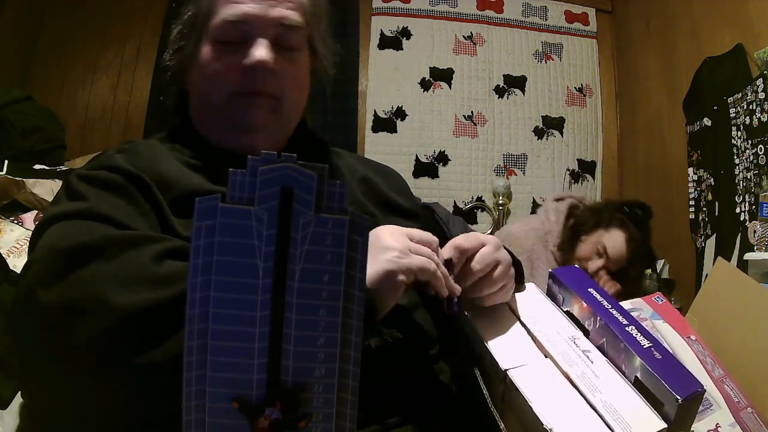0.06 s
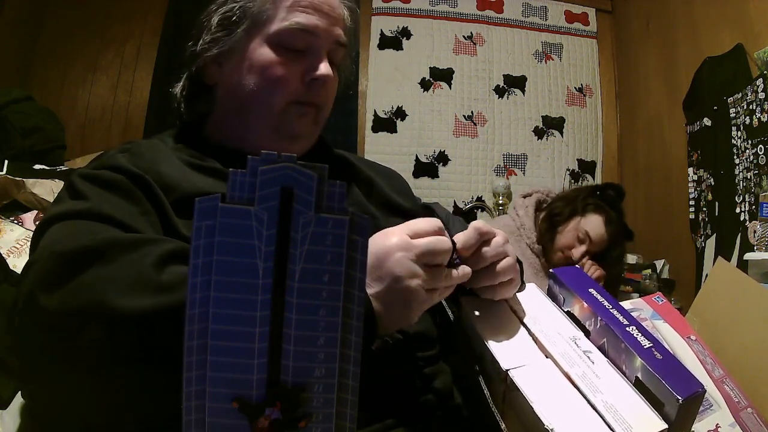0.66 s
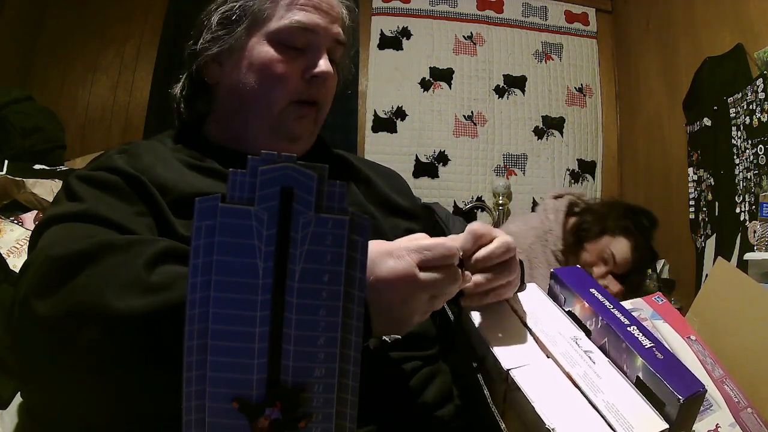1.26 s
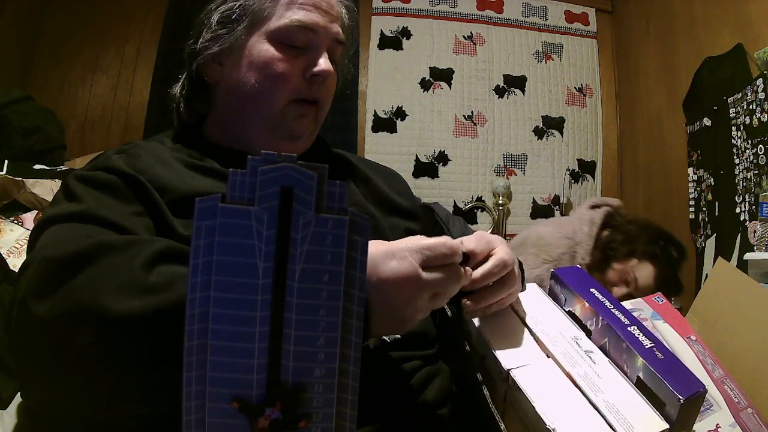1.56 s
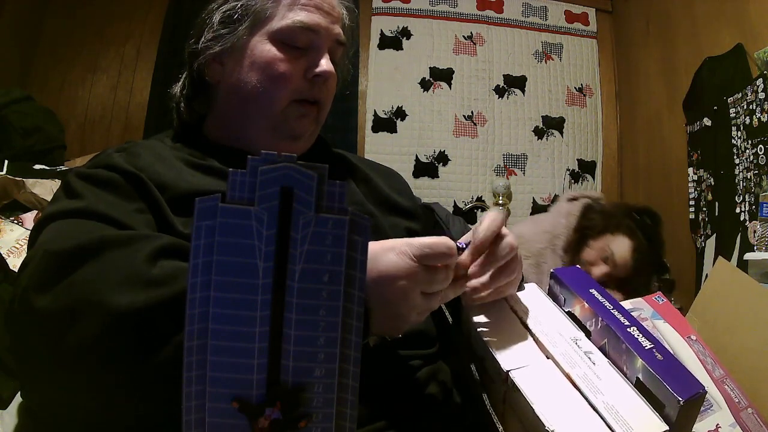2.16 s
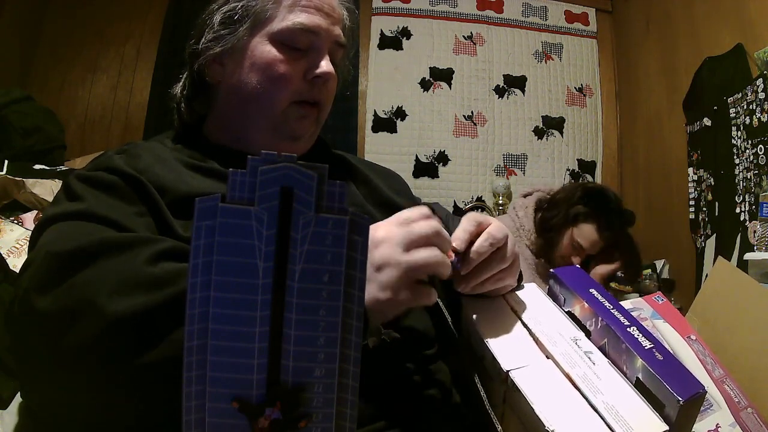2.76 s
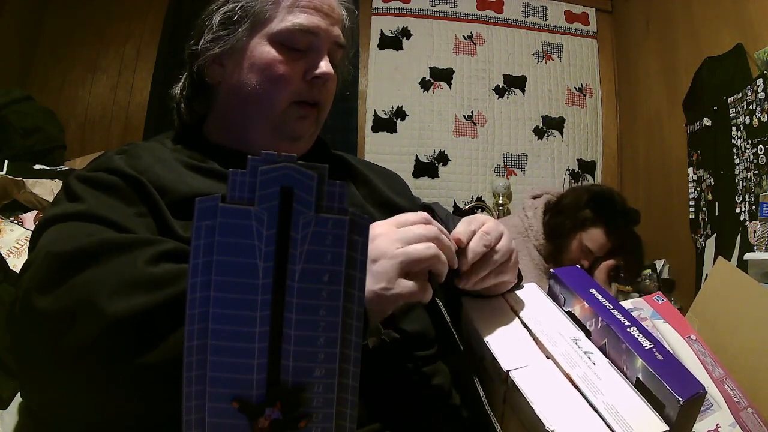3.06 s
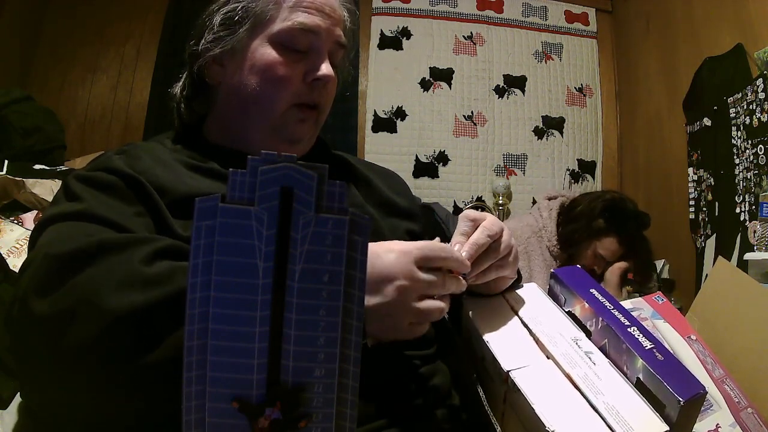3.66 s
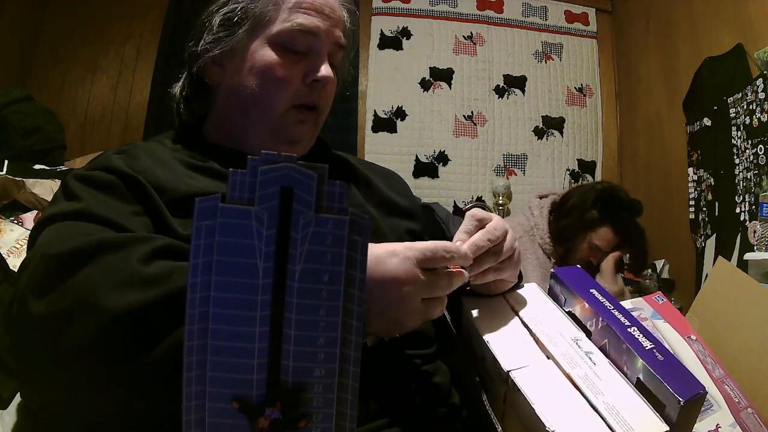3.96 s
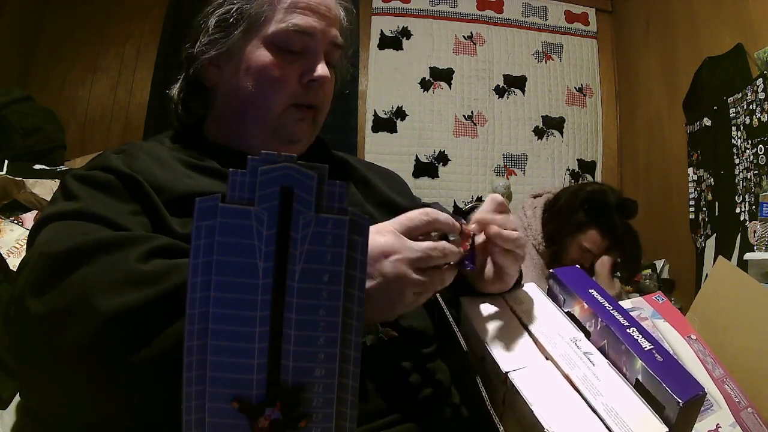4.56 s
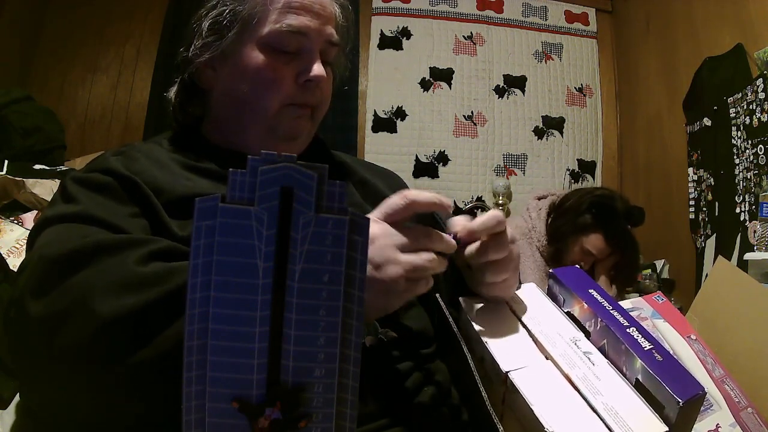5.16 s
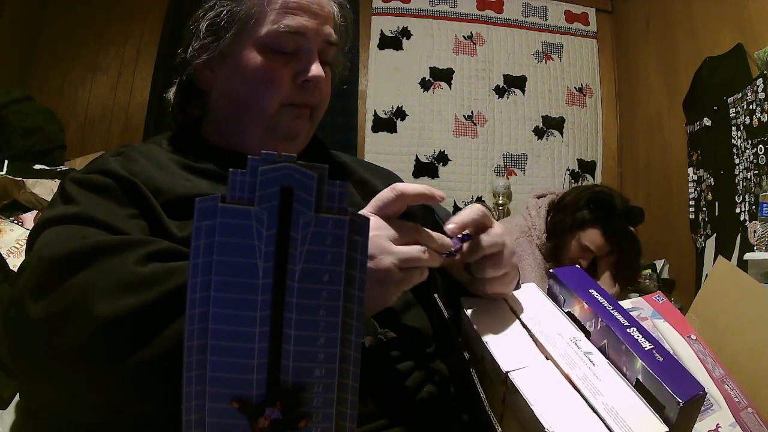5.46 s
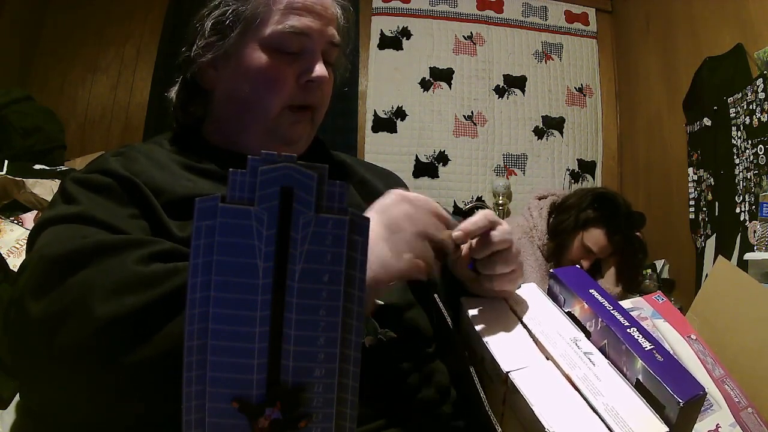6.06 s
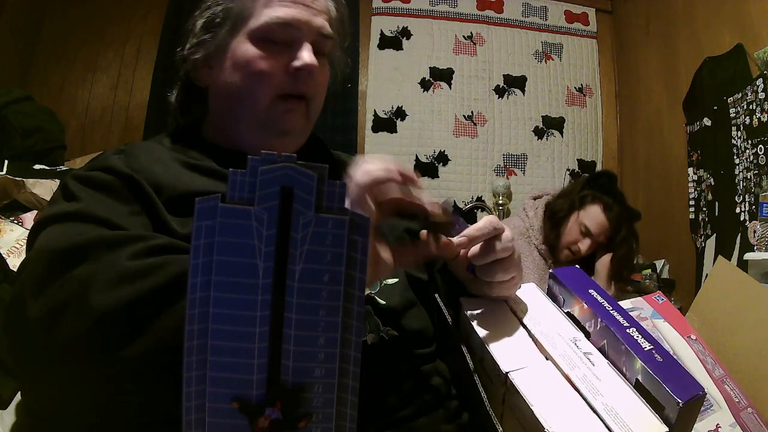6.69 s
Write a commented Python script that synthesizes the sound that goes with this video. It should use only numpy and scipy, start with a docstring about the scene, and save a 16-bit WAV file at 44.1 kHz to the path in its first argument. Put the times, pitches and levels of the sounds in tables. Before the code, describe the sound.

A thin plastic wrapper crinkles and snaps right away as someone works it off a chocolate bar by hand. The crisp crackles come in uneven clusters with short lulls, grow dense again, then fade to light sliding and a few small clicks. The sound is close and fairly dry, in a small room with a steady low hum and a slight high whine behind it.

```python
"""Sharp snaps and crackles of plastic: fingers peel a chocolate bar's wrapper open, close by in a small room.
Big creases snap through one by one, each impulse exciting the damped modes of the facets beside it.
Every squeeze sets off lesser crackles and friction noise; the film slides, wide panels buckle and the
bar knocks softly. Mains hum, a thin electrical whine and quiet room noise lie underneath."""
import sys
import numpy as np
from scipy import signal
from scipy.fft import rfft, irfft
from scipy.io import wavfile
from scipy.ndimage import uniform_filter1d, minimum_filter1d

SR = 44100
rng = np.random.default_rng(int(sys.argv[2]) if len(sys.argv) > 2 else 0)


def materialize(psi):
    """Save the field psi as 16-bit PCM at rate SR to the path in sys.argv[1].

    A 1-D psi becomes a single channel; in a 2-D psi each row is a channel.
    """
    bounded = np.clip(np.atleast_2d(psi).T, -1, 1)
    quanta = np.round(bounded * 32767).astype(np.int16)
    wavfile.write(sys.argv[1], SR, quanta)


N = 305613


def undb(db):
    """Amplitude ratio of a level in decibels."""
    return 10 ** (np.asarray(db) / 20)

def unit(x):
    """Normalisation to an rms of 1."""
    return x / np.sqrt(np.mean(x ** 2))

def gains(outline, size):
    """Magnitude response of a (frequency, level) outline, interpolated in log frequency."""
    hz, db = np.transpose(outline)
    return undb(np.interp(np.log(np.fft.rfftfreq(size, 1 / SR) + 1), np.log(hz), db))

def colour(x, outline):
    """Zero-phase filtering: the spectrum is multiplied by the outline's gains."""
    return irfft(rfft(x) * gains(outline, len(x)), len(x))

def resonance(f, hz, width_hz):
    """Lorentzian peak of one damped mode, 1 at its centre."""
    return 1 / (1 + (2 * (f - hz) / width_hz) ** 2)

def impulse_response(gain):
    """Minimum phase: folding the cepstrum gives a causal click for each row of gains."""
    cepstrum = irfft(np.log(gain + 1e-9))
    half = cepstrum.shape[-1] // 2
    cepstrum[..., 1:half] *= 2
    cepstrum[..., half + 1:] = 0
    return irfft(np.exp(rfft(cepstrum)))

def place(times, levels_db, sounds):
    """Superposition of transients, each scaled to its rms level over the first 3 ms."""
    out = np.zeros(N + sounds.shape[1])
    onset_rms = np.sqrt(np.mean(sounds[:, :int(.003 * SR)] ** 2, axis=1))
    for s, sound in zip(times, sounds * (undb(levels_db) / onset_rms)[:, None]):
        start = int(np.clip(s * SR, 0, N - 1))
        out[start:start + len(sound)] += sound
    return out[:N]


# Spectral envelope of the plastic film: (frequency [Hz], gain [dB])
FILM_SPECTRUM = [(300, -26.5), (1200, -24.5), (2400, -15), (2950, -14), (3700, -4.5), (4400, -3.5),
                 (4850, -3), (5300, -4), (6200, 0.5), (7500, -2.5), (8300, -11), (9700, -12.5),
                 (12000, -24), (16000, -40.5)]

def snaps(times, levels_db, hz, bright_db, size=2048, flutter_s=0.00095, scatter_s=0.017):
    """Impulse excitation: a crease rings two facets; bending waves flutter and the hands scatter them."""
    f, t = np.fft.rfftfreq(size, 1 / SR), np.arange(size) / SR
    # the facet across the crease has another size and rings more weakly
    other_hz = hz[:, None] * np.exp(0.17 * rng.standard_normal((len(times), 1)))
    facets = 0.4 + resonance(f, hz[:, None], width_hz=1150) + 0.33 * resonance(f, other_hz, width_hz=800)
    # tighter creases snap faster and carry more treble; a brightness of -17 dB is neutral
    tilt_db = 0.9 * (np.minimum(bright_db[:, None], 0) + 17)
    treble = undb(tilt_db * np.clip((f - 7000) / 2600, 0, 1.2))
    clicks = impulse_response(gains(FILM_SPECTRUM, size) * facets * treble)
    # film and fingers keep moving, so every snap scatters in its own way
    decay = 0.2 * np.exp(-t / flutter_s) + 0.018 * np.exp(-t / scatter_s)
    rattle = rng.standard_normal((len(times), size)) * decay
    rattle[:, 0] = 1  # direct sound
    return place(times, levels_db, signal.fftconvolve(clicks, rattle, axes=1))


# Big creases giving way: (time [s], level [dB], facet frequency [Hz], brightness [dB])
CREASES = [(0.0377, -14, 6540, -8), (0.0575, -16, 8000, -26), (0.0857, -12, 5800, -14),
           (.1026, -26, 7100, -16), (.1077, -22.5, 4170, -25), (.1496, -17.5, 4100, -17),
           (.1532, -5.5, 6670, -9), (.1813, -23, 5400, -16), (0.2003, -24, 7100, -21),
           (.2076, -17.5, 5500, -5.5), (0.2204, -18, 6000, -6), (.225, -18, 5130, -19),
           (0.2289, -17.5, 5460, -22), (0.2787, -25.5, 6400, 0), (.289, -26, 4240, -18),
           (0.301, -30, 3700, -19), (.3133, -25, 4700, -17), (0.4364, -22.5, 4370, -20),
           (.4392, -13.5, 8050, -12), (.6622, -26.5, 6470, -21), (0.7255, -15, 4900, -16),
           (0.7261, -17.5, 6550, -10), (0.7548, -12.5, 6600, -13), (0.7745, -21, 5060, -25),
           (.779, -22.5, 6900, -11), (.8658, -13, 6660, -9), (0.8879, -13, 6150, -11),
           (0.8969, -8, 5930, -11), (.903, -17, 5800, -4), (0.9204, -14, 5940, 0), (0.97, -28.5, 5860, -25),
           (1.0283, -20.5, 6770, 0), (1.1007, -23, 5330, -9.5), (1.197, -25.5, 6000, 6),
           (1.229, -20, 6900, -6.5), (1.3005, -23.5, 5000, -21), (1.3921, -23, 4500, -12),
           (1.512, -24, 6900, -15), (1.6778, -35.5, 4770, -19), (1.7221, -25, 3250, -21),
           (1.8162, -36, 5040, -24), (1.892, -22, 5500, -24), (1.949, -18.5, 6650, -7.5),
           (1.9865, -27, 5040, -18), (2.06, -31, 7700, -17), (2.2815, -24.5, 6100, -21),
           (2.2948, -17.5, 4940, -16), (2.341, -17.5, 7100, -9), (2.3509, -21.5, 4970, -21),
           (2.364, -21, 7100, -8), (2.4976, -16.5, 4740, -17), (2.537, -25.5, 5000, -28),
           (2.6328, -23.5, 6360, -21), (2.7042, -20.5, 5700, -19), (2.7553, -13.5, 6300, -16),
           (2.7639, -13, 6500, -9.5), (2.793, -17, 5030, -12), (2.872, -16, 5860, -20),
           (2.8834, -19, 6300, -17), (2.973, -30, 5800, -3), (3.006, -31, 2940, -26),
           (3.02, -25, 4900, -29), (3.0664, -16.5, 6000, -12), (3.1183, -12, 6550, -14),
           (3.1417, -19.5, 5400, -11), (3.1751, -13.5, 5930, -6), (3.3296, -18.5, 5050, -13),
           (3.3909, -22.5, 5830, -3), (3.4666, -26.5, 5800, -26), (3.486, -23, 7510, -7),
           (3.495, -12, 6030, -7), (3.5823, -18.5, 5600, -18), (3.6202, -20.5, 5900, -23),
           (3.6328, -19, 5900, -17), (3.7242, -23, 4200, -12), (3.7322, -16.5, 5900, -11),
           (3.78, -25.5, 5300, -12), (3.8535, -24, 5940, -23), (3.9094, -33, 4650, -6),
           (3.9518, -24, 6040, -12), (4.027, -18.5, 5650, -13), (4.1073, -25, 3500, -11.5),
           (4.159, -24.5, 5600, -11), (4.1972, -24.5, 4000, -20), (4.235, -18.5, 6500, -22),
           (4.2954, -16.5, 5360, -13), (4.3042, -15.5, 6260, -13), (4.316, -24, 3800, -13),
           (4.3475, -11.5, 6070, -8.5), (4.3548, -17.5, 6900, -15), (4.3979, -15, 6240, -23),
           (4.4018, -13, 5340, -11), (4.4592, -32.5, 5030, -20), (4.5026, -21, 6560, -14),
           (4.5445, -20.5, 5760, -3), (4.5723, -18, 6000, -28), (4.6051, -20.5, 8200, -1),
           (4.6115, -18.5, 6100, 0), (4.6407, -20, 6340, -17), (4.6558, -21, 6300, -25),
           (4.666, -12, 6500, -13.5), (4.6748, -23, 6100, -20), (4.7052, -11, 6000, -17),
           (4.7308, -20, 4460, -16), (4.7826, -15.5, 7870, -22), (4.8147, -24, 5260, -17),
           (4.8216, -15, 5100, -6), (4.8333, -20.5, 3480, -24), (4.8502, -17.5, 5750, -13),
           (4.861, -15, 6260, -16), (4.8977, -14, 6050, -10), (4.939, -26, 6000, -11),
           (5.0474, -20, 3000, -14), (5.119, -26.5, 6000, -33), (5.149, -29, 5530, -6),
           (5.2794, -35, 6800, -12), (5.412, -36.5, 4300, -12), (5.45, -32, 4300, -19),
           (5.533, -42, 4970, -18), (5.611, -28, 8000, -12), (5.7152, -37.5, 7140, -7),
           (5.9172, -28.5, 2780, -42), (5.922, -32.5, 5800, -6), (5.994, -39, 4500, -28),
           (6.2559, -38, 6860, -5), (6.4682, -21.5, 6660, -10)]

def big_creases():
    """Snap-through instability: each crease releases its elastic energy in one sharp click."""
    return snaps(*np.transpose(CREASES))

def after_snaps(work_db, wait_s=.006, load_share=0.51):
    """Load transfer: a big crease's neighbour gives way just after it, louder under a squeeze."""
    times, crease_db = np.transpose(CREASES)[:2]
    waits = wait_s * rng.uniform(0.55, 2, len(times))
    strength, pitch, bright = rng.standard_normal((len(times), 3)).T
    load_db = work_db[(times * SR).astype(int)]
    mean_db = crease_db + load_share * (load_db - crease_db) - 4
    levels_db = mean_db + 2 * np.clip(strength, -2, 2)
    return snaps(times + waits, levels_db, hz=5700 * np.exp(0.1 * pitch),
                 bright_db=-12 + 5 * bright, size=1024)


# The fingers squeezing or pulling the film: (start [s], hold [s], level [dB])
FINGER_SQUEEZES = [(.06, .19, -35), (.72, 0.095, -42.5), (.86, 0.049, -35.5), (1.07, 0.031, -43.5),
                   (1.19, 0.054, -39.5), (1.42, 0.085, -40.5), (1.73, 0.022, -43.5), (1.89, 0.12, -40.5),
                   (2.28, 0.052, -38.5), (2.42, .16, -42), (2.67, .2, -38.5), (2.99, .06, -39.5),
                   (3.07, 0.051, -29.5), (3.28, .25, -43.5), (3.6, .03, -43), (3.73, .02, -38),
                   (3.94, .32, -40.5), (4.28, .11, -42), (4.52, .2, -36), (4.81, 0.081, -31.5),
                   (4.94, .23, -37.5)]

def finger_work(grip_s=0.024, release_s=0.05, resting_db=-62.5):
    """Driving envelope in dB: each squeeze builds exponentially, holds and relaxes to a faint stir."""
    t = np.arange(N) / SR
    work = np.full(N, undb(resting_db))
    for start, hold_s, db in FINGER_SQUEEZES:
        fade = np.maximum(start - t, 0) / grip_s + np.maximum(t - start - hold_s, 0) / release_s
        work = np.maximum(work, undb(db) * np.exp(-fade))
    return 20 * np.log10(work)

def crackle(drive_db, count, spread_db, hz, pitch_spread, bright_db):
    """Crackling noise: lesser creases give way at random, with amplitudes that follow the drive."""
    times = (np.arange(count) + rng.random(count)) / count * (N - 1) / SR
    strength, pitch, bright = rng.standard_normal((count, 3)).T
    levels_db = drive_db[(times * SR).astype(int)] + spread_db * np.clip(strength, -2, 2)
    return snaps(times, levels_db, hz * np.exp(pitch_spread * pitch), bright_db + 4 * bright, size=512)

def rubbing(work_db, gain_db=-7, grain_db=3.5):
    """Friction noise: film shifting against skin and itself gives a fine, grainy hiss."""
    grains = rng.standard_normal(N) * undb(grain_db * rng.exponential(size=N))
    return unit(colour(grains, FILM_SPECTRUM)) * undb(work_db + gain_db)


# Sliding and rubbing strokes (the film sliding, its seam peeling, late on a finger rubbing and a sleeve
# brushing): (centre time [s], half length [s], level [dB], frequency [Hz])
SLIDE_STROKES = [(0.065, 0.01, -21.5, 5900), (0.12, 0.0063, -35, 4550), (2.179, 0.025, -44, 6050),
                 (2.478, 0.18, -43, 5050), (4.289, 0.0086, -28, 6070), (4.548, 0.0056, -17, 5680),
                 (4.861, 0.054, -31, 2760), (5.272, 0.088, -48.5, 5550), (5.566, 0.052, -53, 6650),
                 (6.099, 0.22, -57.5, 4520), (6.513, 0.025, -39.5, 6460), (6.802, 0.11, -48, 5770)]

def slides(grain_db=2):
    """Stick-slip friction: a swell of tiny slips drives one resonance, heard through the colour of the film."""
    out = np.zeros(N)
    for centre, half_s, db, hz in SLIDE_STROKES:
        span = np.arange(max(0, int((centre - 2 * half_s) * SR)), min(N, int((centre + 2 * half_s) * SR)))
        size = len(span)
        slips = rng.standard_normal(size) * undb(grain_db * rng.exponential(size=size))
        patch = 0.33 + resonance(np.fft.rfftfreq(size, 1 / SR), hz, width_hz=480)
        hiss = unit(irfft(rfft(slips) * patch * gains(FILM_SPECTRUM, size), size))
        swell = np.exp(-((span / SR - centre) / half_s) ** 2)
        out[span] += hiss * undb(db) * swell
    return out

def thuds(table, relative_width, scatter, scatter_s, gain_db, size=2048):
    """Heavy damping: an impulse excites one broad resonance, followed by a short scattered tail."""
    times, levels_db, hz = np.transpose(table)
    f, t = np.fft.rfftfreq(size, 1 / SR) + 1, np.arange(size) / SR
    detuning = f / hz[:, None] - hz[:, None] / f
    clicks = impulse_response(1 / (1 + (detuning / relative_width) ** 2))
    tail = scatter * rng.standard_normal((len(times), size)) * np.exp(-t / scatter_s)
    tail[:, 0] = 1  # direct sound
    return place(times, levels_db + gain_db, signal.fftconvolve(clicks, tail, axes=1))


# Wide panels of the wrapper giving way: (time [s], relative level [dB], frequency [Hz])
PANEL_BUCKLES = [(.1497, -39, 2220), (.221, -39, 1900), (.8965, -29.5, 1610), (1.7215, -40, 1640),
                 (2.296, -40, 1690), (3.1185, -39, 2030), (3.972, -38, 1640), (4.198, -36.5, 2300),
                 (4.3045, -38, 2020), (4.3475, -34, 1750), (4.415, -36, 2000), (4.545, -38, 1990),
                 (4.822, -38, 2400), (4.878, -33, 2500)]

def panel_buckles():
    """Buckling: a wide panel pops at a lower frequency than the small facets."""
    return thuds(PANEL_BUCKLES, relative_width=0.46, scatter=0.023, scatter_s=0.013, gain_db=3.5)


# The bar knocking between the fingers: (time [s], relative level [dB], frequency [Hz])
BAR_KNOCKS = [(.897, -42, 850), (1.986, -42, 517), (2.29, -43, 560), (4.304, -40.5, 483),
              (4.3478, -33, 527), (4.5443, -31.5, 600)]

def bar_knocks():
    """Damped impact: the bar meets the fingers with a soft, low knock."""
    return thuds(BAR_KNOCKS, relative_width=1.0, scatter=0.02, scatter_s=0.0056, gain_db=0.5)

def room(x, tail_db=-14, t60_s=0.12, build_s=0.0074, echo_s=.0505, echo_db=-26):
    """Reverberation: wall reflections add a short, exponentially decaying tail and one faint echo."""
    t = np.arange(SR // 2) / SR
    tail = colour(rng.standard_normal(len(t)), [(300, 2.5), (6500, 0.0), (10000, 0.5), (16000, 1.5)])
    tail *= np.exp(-np.log(1000) * t / t60_s) * np.clip(t / build_s, 0, 1)
    response = undb(tail_db) * tail / np.linalg.norm(tail)
    response[0] += 1
    response[int(echo_s * SR)] += undb(echo_db)
    return signal.fftconvolve(x, response)[:N]


# Partials of the mains hum and electrical whine: (frequency [Hz], rms level [dB])
HUM_PARTIALS = [(60, -42.5), (120, -64), (292.5, -65), (585, -65), (1003, -61.5), (1170.2, -52.5),
                (2675, -68)]

def hum():
    """Line spectrum: phase drift grows with frequency, so the hum is steady and the whine wavers a little."""
    t = np.arange(N) / SR
    knots = np.linspace(0, t[-1], num=40)
    out = np.zeros(N)
    for hz, db in HUM_PARTIALS:
        walk = np.cumsum(rng.standard_normal(len(knots)))
        drift = np.interp(t, knots, walk) * hz / 8000
        out += np.sqrt(2) * undb(db) * np.sin(2 * np.pi * (hz * t + rng.random()) + drift)
    return out


# Spectrum of the room's background noise: (frequency [Hz], relative spectral density [dB])
ROOM_NOISE_SPECTRUM = [(25, -5), (100, -9), (190, 2.5), (310, 3), (420, -4.5), (600, 0), (800, -6.5),
                       (1700, -1.5), (2900, -9.5), (4500, -10), (6100, -11), (7800, -22), (11000, -27.5),
                       (16000, -33)]

def room_noise(rms_db=-47.5):
    """Stationary Gaussian noise: a soft, continuous spectrum that falls away in the treble."""
    return undb(rms_db) * unit(colour(rng.standard_normal(N), ROOM_NOISE_SPECTRUM))

def scene():
    """Superposition: the wrapper sounds in the room, over hum and room noise, in one channel."""
    work_db = finger_work()
    ticks = crackle(work_db + 8, count=220, spread_db=2.3, hz=5420, pitch_spread=0.21, bright_db=-15)
    fine = crackle(work_db - 0.5, count=650, spread_db=1.5, hz=5900, pitch_spread=0.12, bright_db=-21)
    creases = big_creases() + after_snaps(work_db) + ticks + fine
    wrapper = creases + rubbing(work_db) + slides() + panel_buckles() + bar_knocks()
    noise = room_noise()
    return (room(wrapper) + hum() + noise)[None]

def record(dry, ceiling=1.0, window_s=.0007, cutoff_hz=15900):
    """Peak and band limiting: the gain dips at any peak over the ceiling; a low-pass cuts the top."""
    size = int(window_s * SR)
    needed = np.minimum(1, ceiling / (np.abs(dry) + 1e-9))
    gain = uniform_filter1d(minimum_filter1d(needed, size), size)
    lowpass = signal.ellip(8, .2, 70, cutoff_hz, fs=SR, output="sos")
    return signal.sosfilt(lowpass, dry * gain)


dry = scene()
out = record(dry)
materialize(out)
```